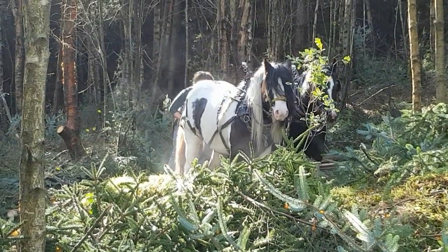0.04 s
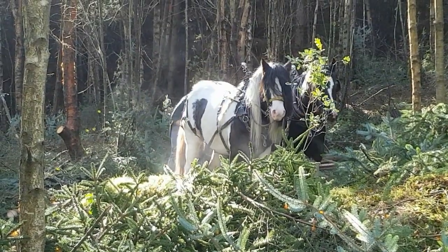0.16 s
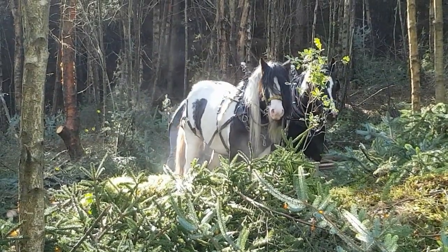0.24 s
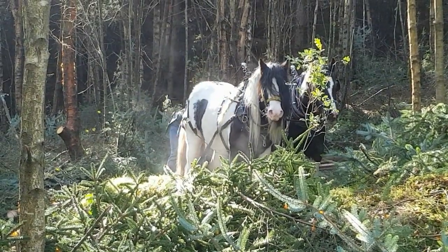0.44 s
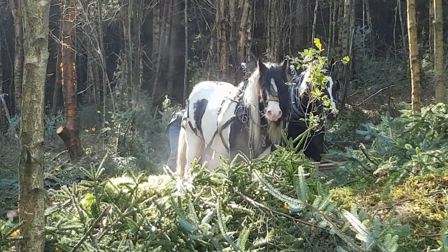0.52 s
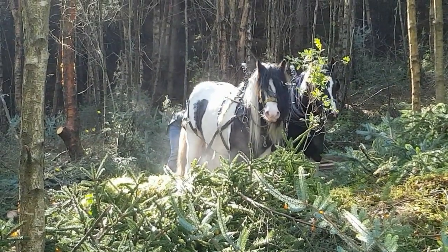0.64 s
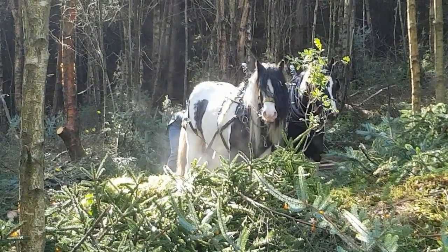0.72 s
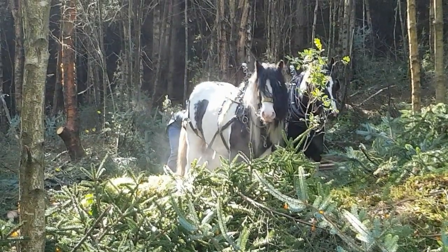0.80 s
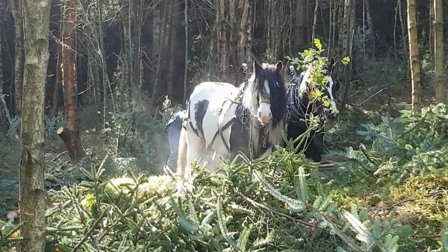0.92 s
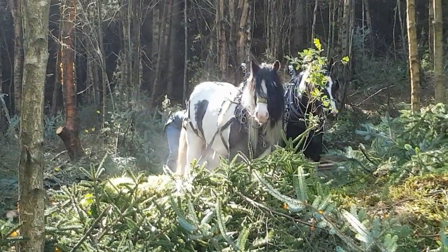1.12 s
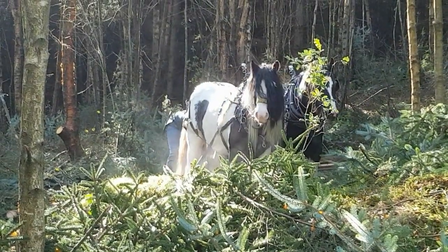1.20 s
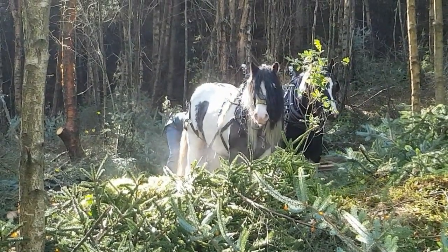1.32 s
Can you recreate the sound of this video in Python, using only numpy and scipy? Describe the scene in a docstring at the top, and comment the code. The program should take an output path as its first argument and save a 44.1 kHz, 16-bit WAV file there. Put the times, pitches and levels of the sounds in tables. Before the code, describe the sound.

A steel chain rattles briefly on a horse's harness in front of the microphone, after a few light clinks and with soft hoof thuds beneath. It rings out among the trees, and a far bird chirps faintly in the quiet wood.

```python
"""Small rings tinkle on the harness of a draught horse shifting its weight in a conifer wood. Then the
trace chain drops against its steel fittings, rattles and settles, leaving one hook ringing. Each impact
excites damped modes of the steel, and trunks scatter the sound. Hooves thud softly, and a far bird
sings a falling phrase over the steady hush of the forest."""
import sys
import numpy as np
from scipy import signal
from scipy.fft import rfft, irfft
from scipy.io import wavfile
from scipy.ndimage import uniform_filter1d

SR = 44100
rng = np.random.default_rng(int(sys.argv[2]) if len(sys.argv) > 2 else 0)


def bounce(signal):
    """Save signal as a 16-bit WAV file at the path given by the first command-line argument."""
    frames = np.transpose(np.atleast_2d(signal))
    limited = np.clip(frames, -1, 1)
    pcm = np.round(limited * 32767).astype(np.int16)
    wavfile.write(sys.argv[1], SR, pcm)


N = 59535
TIME, FREQS = np.arange(N) / SR, np.fft.rfftfreq(N, 1 / SR)
LEFT_RIGHT = np.array([[1], [-1]])


def undb(db):
    """Amplitude ratio of a level in decibels."""
    return 10 ** (np.asarray(db) / 20)


def decay(t60):
    """Exponential damping by 60 dB in t60 seconds."""
    return np.exp(-np.log(1000) * TIME / max(t60, 1e-3))


def unit(x):
    """Normalisation to rms 1."""
    return x / np.sqrt(np.mean(x ** 2))


def curve(points):
    """Interpolation of (Hz, value) points over log frequency."""
    hz, value = np.array(points).T
    return np.interp(np.log(FREQS + 1), np.log(hz), value)


def noise(gain):
    """Spectral shaping of white noise, at rms 1."""
    return unit(irfft(rfft(rng.standard_normal(N)) * gain, N))


def add(out, start, x):
    """Superposition of a sound from its start time on."""
    i = int(np.clip(start * SR, 0, N - 1))
    out[..., i:] += x[..., :N - i]


def pair(a, b, correlation):
    """Partial coherence: sum and difference of two independent sounds give left and right."""
    alike = np.clip(curve(correlation), -.99, .99)
    mid = rfft(a) * np.sqrt((1 + alike) / 2)
    side = rfft(b) * np.sqrt((1 - alike) / 2)
    return irfft(np.array([mid + side, mid - side]), N)


# spectrum of the hush (frequency [Hz], relative level [dB])
HUSH_SPECTRUM = [(15, -30), (30, -5.5), (55, -4.5), (110, -3), (175, -2), (320, -7.5), (500, -6.5),
                 (800, -8), (1000, -3), (1400, -11.5), (2000, -9.5), (2800, -9.5), (3400, -10.5),
                 (5000, -24), (7000, -30.5), (10000, -34.5), (15500, -29.5)]
# left-right coherence of its diffuse part (frequency [Hz], correlation [-1..1])
HUSH_COHERENCE = [(40, .86), (150, 0.77), (300, 0.67), (600, 0.2), (1200, -0.54), (4000, -0.07)]
# part arriving from the left (frequency [Hz], power share [0..1])
HUSH_FROM_LEFT = [(300, 0), (700, 0.35), (1300, 0.42), (3000, 0.76), (6000, 0.011)]
def hush(level_db=-55.5, right_lag_s=.00043):
    """Distant air in the trees: a diffuse field plus a plane wave that reaches the left first."""
    colour, share = undb(curve(HUSH_SPECTRUM)), curve(HUSH_FROM_LEFT)
    diffuse = rfft(pair(noise(colour), noise(colour), HUSH_COHERENCE))
    delay = np.exp(-2j * np.pi * FREQS * np.array([[0], [right_lag_s]]))
    plane_wave = rfft(noise(colour)) * delay
    return undb(level_db) * irfft(diffuse * np.sqrt(1 - share) + plane_wave * np.sqrt(share), N)


def echoes(trunks_per_s=1500, trunk_db=-.5, tail_db=-8):
    """Impulse response of the wood: discrete reflections from near trunks, then a diffuse tail."""
    air = rng.standard_normal(N)
    reflections = rng.standard_normal(N) * (rng.random(N) < trunks_per_s / SR)
    trunks = reflections * decay(t60=.25) * (TIME > .002)
    low = signal.sosfiltfilt(signal.butter(2, 6000, fs=SR, output="sos"), air)
    tail = low * decay(t60=1) + (air - low) * decay(t60=.97)
    tail *= 1 - np.exp(-TIME / .019)
    return (undb(trunk_db) * unit(trunks) + undb(tail_db) * unit(tail)) / np.sqrt(N)


# left-right coherence of the echoes (frequency [Hz], correlation [-1..1])
ECHO_COHERENCE = [(200, 0.92), (1300, 0), (3000, 0), (8000, 0)]
def forest(x):
    """Reverberation: convolution with the wood's response on each side."""
    return signal.fftconvolve(x[None], pair(echoes(), echoes(), ECHO_COHERENCE))[:, :N]


# whistled notes (time [s], duration [s], start pitch [Hz], end pitch [Hz], relative level [dB])
BIRD_NOTES = [(0.761, 0.017, 5310, 6670, -60), (0.791, 0.0297, 5400, 5040, -61),
              (0.867, 0.046, 4460, 3800, -64.5), (0.99, 0.024, 3440, 3350, -65),
              (1.016, 0.0734, 3150, 3336, -64), (1.119, 0.03, 3815, 3495, -63),
              (1.245, 0.032, 3250, 2990, -66.5)]
def bird(level_db=1.5):
    """Frequency modulation: short whistles glide and waver in a falling phrase."""
    out = np.zeros(N)
    for start, length, from_hz, to_hz, db in BIRD_NOTES:
        progress = np.clip((TIME - start) / length, 0, 1)
        waver = 1 + .029 * unit(uniform_filter1d(rng.standard_normal(N), size=200))
        hz = (from_hz + (to_hz - from_hz) * progress) * waver
        out += undb(level_db + db) * np.sin(np.pi * progress) * np.sin(2 * np.pi * np.cumsum(hz) / SR)
    return out


# hoof falls (time [s], level [dB], spectral peak [Hz])
HOOF_FALLS = [(0.233, -52.5, 130), (0.274, -52.5, 197), (.36, -53, 65), (.685, -55, 107.5)]
def hooves(attack_s=.011):
    """Cushioned impact: weight shifting on soft ground excites mainly low frequencies."""
    out = np.zeros(N)
    envelope = (1 - np.exp(-TIME / attack_s)) * decay(t60=.34)
    for start, db, hz in HOOF_FALLS:
        colour = undb(curve([(hz / 2, -24), (hz, 0), (hz * 2, -16), (hz * 10, -60)]))
        add(out, start, undb(db) * noise(colour) * envelope)
    return out


def tilt(hz, slope_db, pivot_hz):
    """Spectral tilt: harder contact favours the modes above the pivot."""
    return undb(slope_db * np.clip(np.log2((hz + 1) / pivot_hz), -2, 2))


def struck_steel(modes, slope_db, pivot_hz, scatter_db, detune):
    """Modal vibration: each contact weights the modes anew; they reach the two sides out of step."""
    out = 0
    for hz, db, t60 in modes:
        size, drift, skew = rng.standard_normal(3)
        amplitude = undb(db + scatter_db * size) * tilt(hz, slope_db, pivot_hz)
        phase = 2 * np.pi * hz * (1 + detune * drift) * TIME + .56 * skew * LEFT_RIGHT
        out = out + amplitude * decay(t60) * np.sin(phase)
    return out


# spectrum of the links (frequency [Hz], relative level [dB])
LINK_SPECTRUM = [(200, -22), (600, -15), (1000, -12), (1350, -0.5), (2200, -3.5), (3300, 0.5), (4000, -2.5),
                 (4800, -0.5), (5800, -3.5), (8200, -0.5), (9500, -15), (12500, -11), (15500, -14.5)]
def contact_colour(slope_db):
    """Spectral envelope of a steel contact, tilted by its hardness."""
    return undb(curve(LINK_SPECTRUM)) * tilt(FREQS, slope_db, pivot_hz=5200)


# modes of the small rings (frequency [Hz], relative level [dB], T60 [s])
RING_MODES = [(7270, 2.5, 0.089), (7540, -7.5, 0.75), (8360, -4.5, 0.11), (8040, -5.5, 0.82),
              (8300, -19, 0.18), (8560, -5, 0.14)]
# their touches (time [s], relative level [dB], click offset [dB])
RING_TOUCHES = [(.001, -22, 3), (0.076, -22, 1), (0.122, -23.5, -11), (0.151, -12, -6), (.233, -7, -4),
                (0.2418, -9, 6.5), (0.2466, -3, 3)]
def small_rings(ring_db=-42, click_db=-43):
    """Light impacts: small harness rings click and vibrate in high modes."""
    out = np.zeros((2, N))
    for start, db, click_offset_db in RING_TOUCHES:
        click = undb(click_db + click_offset_db) * noise(contact_colour(0)) * decay(t60=.096)
        tinkle = struck_steel(RING_MODES, slope_db=0, pivot_hz=8500, scatter_db=3.5, detune=.0031)
        add(out, start, undb(db) * (click + undb(ring_db) * tinkle))
    return out


# single pieces left ringing (time [s], frequency [Hz], level [dB], T60 [s])
HOOK_TONES = [(.2465, 6400, -44, 0.075), (0.2445, 11960, -44, .14), (0.248, 12902, -37, 0.1),
              (0.246, 13973, -44, 0.13), (.279, 3499, -38.5, 0.08), (.38, 10820, -42, 0.23),
              (0.443, 3490, -39.5, 0.16), (.441, 2440, -48, 0.18), (0.527, 1320, -49, .4),
              (0.5403, 1320, -49, 0.11), (0.565, 2998, -54, 0.49), (.592, 14200, -61, 0.13),
              (0.598, 2998, -44.5, 0.14), (.632, 2998, -46.5, 0.22), (.632, 12540, -59.5, 0.11)]
def hooks():
    """Free vibration: a piece that swings clear rings on in one damped mode."""
    out = np.zeros(N)
    for start, hz, db, t60 in HOOK_TONES:
        envelope = np.zeros(N)
        add(envelope, start, undb(db) * decay(t60))
        out += envelope * np.sin(2 * np.pi * hz * TIME)
    return out


# modes of the fittings, one list each (frequency [Hz]), (relative level [dB]), (T60 [s])
FITTING_FREQS = [733, 1381, 1456, 1920, 2155, 2442, 2970, 3487, 4704, 4783, 5115, 5479, 6298, 7734]
FITTING_LEVELS = [-13, -4, -5, 2, -6, 0, -1, 3, -1, -4, -1, 0, -2, -8]
FITTING_DECAYS = [.2, .2, .28, .2, .35, .22, .3, .16, .24, .24, .33, .26, .28, .3]
def fittings(slope_db, level_db=-41):
    """Resonance: one blow excites the inharmonic modes of the steel fittings."""
    modes = zip(FITTING_FREQS, FITTING_LEVELS, FITTING_DECAYS)
    return undb(level_db) * struck_steel(modes, slope_db, pivot_hz=2650, scatter_db=.56, detune=.00253)


def link_modes(count):
    """Uniform modal density: one spectral line at random in each equal band."""
    lines = np.zeros(N // 2 + 1)
    bins = (np.arange(count) + rng.random(count)) * (N // 2) / count
    lines[bins.astype(int)] = 1
    return lines


def clack(links, slope_db, level_db=-32):
    """Impulsive excitation: a broadband crack, and the links' modes ringing in a new mixture."""
    colour = contact_colour(slope_db)
    ringing = noise(colour * links) * decay(t60=.13)
    crack = noise(colour) * decay(t60=.015)
    return undb(level_db) * (ringing + crack)


# chain blows (time [s], relative level [dB], tilt [dB/octave], fittings offset [dB])
CHAIN_BLOWS = [(.2777, -9.5, -2.5, -0.5), (.3075, -10, -6.5, -0.5), (.3185, -3, -.5, 9),
               (0.3234, -1.5, -1, -7), (.333, -4.5, 4.5, -6.5), (.346, -2.5, -4, 2), (.36, -6.5, 13, -14),
               (.3795, -4, 0.5, -4), (.384, -9, -3.5, -6.5), (.412, -13.5, -3.5, 0.5), (.441, -13, 6, -4),
               (0.5289, -15.5, 4, 3.5), (.5415, -18, -7, -9), (0.5672, -9.5, -1.5, -2),
               (.572, -18, -2, -25), (.6319, -16, 1.5, -17), (0.6688, -18.5, -3, -2.5)]
# links sliding over each other (time [s], duration [s], relative level [dB], tilt [dB/octave])
CHAIN_SLIDES = [(0.269, .055, -15.5, 7.5), (.33, .11, -13, 7.5), (0.444, .08, -27, 0.5),
                (0.521, .09, -25, -2), (0.612, .1, -32.5, -3.5)]
def chain(contacts_per_s=130):
    """Repeated collision: blows excite links and fittings; sliding links rattle in lighter contacts."""
    rattle, steel, links = np.zeros(N), np.zeros((2, N)), link_modes(count=340)
    for start, db, slope_db, fittings_db in CHAIN_BLOWS:
        add(steel, start, undb(db + fittings_db) * fittings(slope_db))
        add(rattle, start, undb(db) * clack(links, slope_db))
    for start, length, db, slope_db in CHAIN_SLIDES:
        for offset in np.arange(0, length, 1 / contacts_per_s):
            onset = start + offset + rng.random() / contacts_per_s
            add(rattle, onset, undb(db + 2 * rng.standard_normal()) * clack(links, slope_db))
    return rattle, steel


# balance of the harness and its echoes (frequency [Hz], left minus right [dB])
HARNESS_BALANCE = [(1300, .5), (2500, 0.5), (5000, 1.4), (9000, -3), (13000, -1)]
def scene(bird_echo_db=6.5, tone_echo_db=-7, right_lag_s=.00002):
    """Direct and reverberant fields: the harness is almost straight ahead, the bird deep in the trees."""
    song = bird()
    background = hush() + hooves() + song + undb(bird_echo_db) * forest(song)
    rattle, steel = chain()
    jingle, tones = small_rings() + rattle, hooks() + steel
    left, right = jingle + tones
    direct = np.array([left, np.interp(TIME - right_lag_s, TIME, right)])
    scattered = forest((jingle + undb(tone_echo_db) * tones).mean(axis=0))
    balance = undb(curve(HARNESS_BALANCE) * LEFT_RIGHT / 2)
    return irfft(rfft(direct + scattered) * balance, N) + background


def record(dry):
    """Band limiting: a steep low-pass at 15.5 kHz."""
    return signal.sosfilt(signal.ellip(10, .2, 75, 15500, fs=SR, output="sos"), dry)


dry = scene()
out = record(dry)
bounce(out)
```